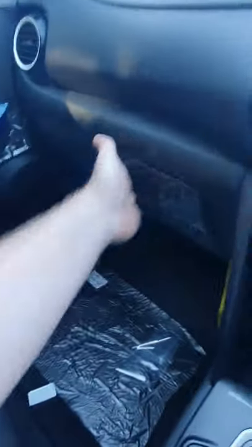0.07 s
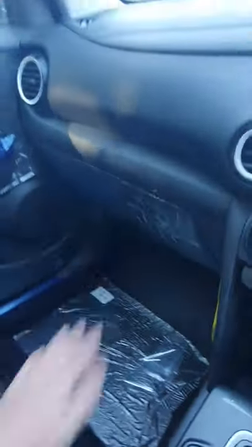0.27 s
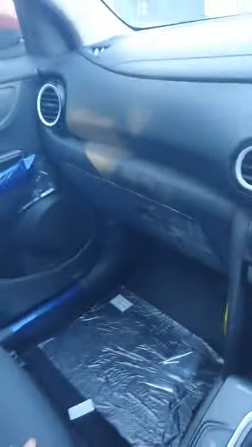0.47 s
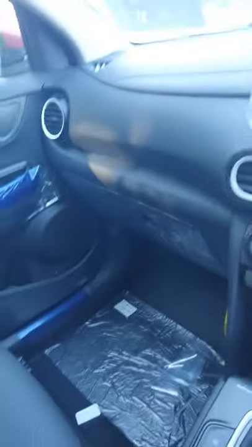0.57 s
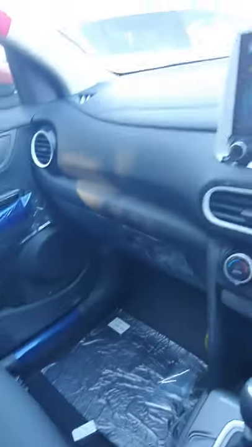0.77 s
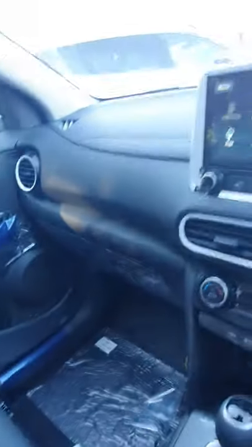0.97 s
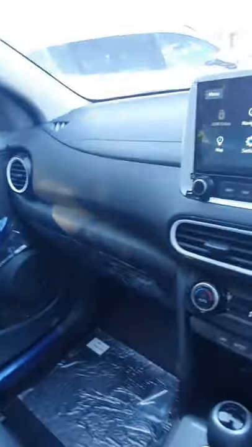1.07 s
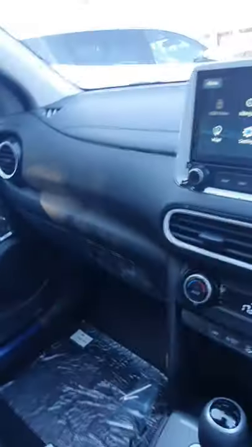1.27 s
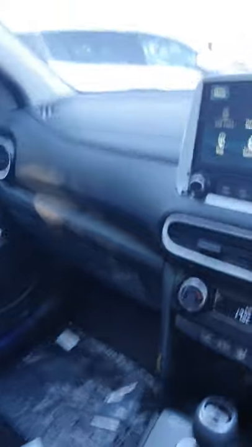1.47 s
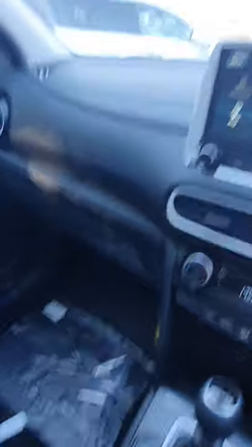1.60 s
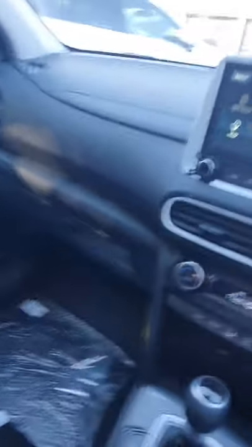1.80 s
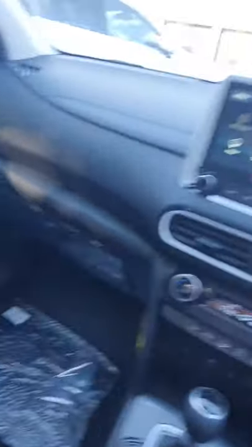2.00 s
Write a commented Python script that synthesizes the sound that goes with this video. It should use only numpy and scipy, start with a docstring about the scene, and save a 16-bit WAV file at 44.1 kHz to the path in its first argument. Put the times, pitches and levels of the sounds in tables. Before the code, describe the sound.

Inside a parked car, close to a hand-held phone microphone, a plastic glove box lid shuts with a dull thud and short rattle; patchy cloth rustle and low knocks follow, then a loud handling click and near quiet.

```python
"""In a parked car, over low cabin rumble and faint hiss, a glove box lid thumps shut: struck modes and noise.
Loose parts rattle and the dashboard shudders: band noise and low decaying sines.
A sleeve then rubs along the seat, patchy shaped noise, while soft bumps reach the hand-held phone.
Late on, fingers shift on its case: clicks of band noise and ringing, a short hissing slide, a hollow tap."""
import sys
import numpy as np
from scipy import signal
from scipy.fft import rfft, irfft
from scipy.io import wavfile
from scipy.ndimage import uniform_filter1d

SR = 44100
rng = np.random.default_rng(int(sys.argv[2]) if len(sys.argv) > 2 else 0)


def boost_factor(decibels):
    """Convert a level in decibels to a linear amplitude factor."""
    exponent = np.asarray(decibels, float) / 20
    return 10 ** exponent


def dump(signal):
    """Clip the signal to [-1, 1] and save it as 16-bit WAV at the path in sys.argv[1]."""
    limited = np.clip(np.atleast_2d(signal).T, -1, 1)
    pcm = np.round(limited * 32767).astype(np.int16)
    wavfile.write(sys.argv[1], SR, pcm)


N = 90140

# cabin rumble spectrum, relative: (frequency [Hz], density [dB per Hz])
CABIN_SPECTRUM = [(15, -19), (25, -3), (130, -1.5), (165, -20), (270, -8.5), (350, -19), (460, -18),
                  (1000, -38)]
# microphone hiss spectrum, relative: (frequency [Hz], density [dB per Hz])
HISS_SPECTRUM = [(410, -1), (1440, -10.5), (5800, -22.5), (13000, -12), (15700, -32), (16100, -59)]
# sleeve rubbing, rms of each range: (time [s], treble level [dB], mid level [dB])
RUB_LEVELS = [(0.351, -59.5, -96), (.365, -49, -55), (.4, -50.5, -56.5), (0.428, -56, -60),
              (.46, -45, -57.5), (.52, -46.5, -56.5), (.65, -51, -57.5), (.76, -58, -57), (.78, -50, -66),
              (.805, -58.5, -58.5), (.85, -50.5, -59), (.92, -51, -54), (.96, -58.5, -58),
              (1.08, -51.5, -54), (1.25, -56.5, -54), (1.33, -61, -59), (1.375, -66, -67.5),
              (1.44, -65, -63), (1.503, -50.5, -56.5), (1.575, -75.5, -75), (1.7, -69.5, -67),
              (2.04, -62, -61.5)]
# treble range of the rub, relative: (frequency [Hz], density [dB per Hz])
RUB_TREBLE_SPECTRUM = [(1760, -13), (3000, -1), (4630, 2), (12000, 2.5), (15700, 4.5), (16100, -45)]
# mid range of the rub, relative: (frequency [Hz], density [dB per Hz])
RUB_MID_SPECTRUM = [(150, -21), (260, 0), (460, 6.5), (730, -3), (1720, 3), (2530, 1.5), (4420, -5),
                    (6500, -31)]
# finger clicks on the case: (time [s], level [dB], ring [Hz], snap spread [ratio round the ring])
CLICKS = [(1.4385, -29, 7000, 2.6), (1.502, -36, 12500, 14), (1.504, -28, 5500, 8),
          (1.5147, -40, 2600, 2.5), (1.519, -34, 2000, 4), (1.5228, -21.5, 3600, 6),
          (1.525, -22.5, 1850, 5), (1.5266, -12, 13500, 8), (1.6585, -48, 2100, 1.7),
          (1.6819, -39, 2300, 2.6), (1.7035, -51, 11500, 2)]
# fingertip slide on the case: (time [s], length [s], level [dB])
SLIDES = [(1.531, .014, -39)]
# modes of a tapped hollow plastic part: (frequency [Hz], relative level [dB], t60 [s])
TAP_MODES = [(1290, 0, .075), (1500, -3, .03), (1850, -6, .03), (2600, -10, .03), (3200, -10, .025)]
# clatter of loose parts as the lid settles: (time [s], length [s], level [dB], centre [Hz])
RATTLES = [(0.036, 0.019, -54, 1800), (0.0635, 0.026, -52, 1700), (0.073, 0.022, -58, 4700),
           (.104, .022, -64, 4400)]
# soft bumps and shudders: (time [s], level [dB], frequency [Hz], t60 [s])
BUMPS = [(.032, -20, 46.5, 0.12), (0.055, -22, 39.8, 0.13), (0.075, -24.5, 98, 0.057),
         (0.098, -28.5, 36, 0.6), (.148, -35, 35.6, 0.15), (0.207, -37, 44.2, 0.36),
         (0.286, -40.5, 45, 0.31), (0.357, -25, 112, 0.023), (.374, -28.5, 90.5, 0.13),
         (0.3957, -20.5, 102, 0.078), (0.405, -21.5, 99, 0.03), (0.423, -21, 60, 0.18),
         (0.451, -21.5, 106.5, 0.12), (.508, -38, 97.5, 0.19), (.543, -38, 60, 0.21),
         (0.623, -37.5, 48.4, 0.11), (0.621, -40.5, 235, 0.056), (.795, -39, 234, 0.066),
         (0.912, -33.5, 103, 0.11), (1.332, -43.5, 46, 0.16), (1.5264, -15.5, 144, 0.015),
         (1.533, -31, 61.7, 0.054), (1.884, -40, 88.5, 0.11), (1.989, -49, 452, 0.062)]
# overtones of a bump: (frequency [Hz], relative level [dB], t60 [s])
BUMP_MODES = [(217, -10.5, 0.02), (403, -17.5, 0.017), (579, -36, 0.034)]
# lid blow and rebound: (time [s], level [dB], contact of four time constants [ms])
LID_BLOWS = [(-0.003, -16.5, 0.43), (0.002, -17.5, 0.95)]
# modes of lid and dashboard: (frequency [Hz], relative level [dB], t60 [s])
LID_MODES = [(103.4, 3, 0.047), (198, -11, 0.036), (433, -2.5, 0.017), (1190, -14, 0.0056),
             (1860, -12, 0.019), (3260, -23, 0.0073)]

CABIN_DB, HISS_DB = -55, -69
RUB_PATCH_DB, RUB_PATCHES_PER_S = 2.5, 14
SCRAPE_HZ, SCRAPE_DB, SCRAPE_FLICKER_DB = 1850, -13, 4  # SCRAPE_DB is relative to the mid range
CLICK_SNAP_DB, CLICK_RING_DB = 4, -4  # relative to the click
CLICK_SNAP_T60_S, CLICK_RING_T60_S = 0.003, 0.0045
TAP_S, TAP_DB, TAP_RISE_T60_S = 1.6196, -42, 0.001
BUMP_RISE_CYCLES, BUMP_SCUFF_T60_S = 0.14, 0.059
LID_CHATTER_DB, LID_RATTLE_DB = -6, -15.5  # relative to the blow
LID_RATTLE_T60_S, LID_RATTLE_TOP_HZ = 0.077, 3030
MIC_DIP_HZ, MIC_DIP_WIDTH_HZ, MIC_DIP_SHARE = 9100, 3050, 0.44


def unit(x):
    """Scale to rms 1."""
    return x / np.sqrt(np.mean(x ** 2))


def colour(x, points):
    """Shape by (Hz, dB) points, then scale to rms 1."""
    hz, db = np.array(points, float).T
    bin_hz = np.maximum(np.arange(len(x) // 2 + 1) * SR / len(x), 1)
    gain_db = np.interp(np.log(bin_hz), np.log(hz), db)
    return unit(irfft(rfft(x) * boost_factor(gain_db), len(x)))


def walk(rate_hz):
    """Random levels drawn rate_hz times a second and joined by ramps; rms near 1."""
    hold = int(SR / rate_hz)
    steps = np.repeat(rng.standard_normal(N // hold + 1), hold)
    return unit(uniform_filter1d(steps, hold)[:N])


def fade(t, t60_s):
    """Decay by 60 dB in t60_s."""
    return np.exp(-np.log(1000) * t / t60_s)


def ring(t, modes):
    """Sum of decaying sines."""
    return sum(boost_factor(db) * np.sin(2 * np.pi * hz * t) * fade(t, t60_s) for hz, db, t60_s in modes)


def burst(t, t60_s):
    """Decaying white noise."""
    return rng.standard_normal(len(t)) * fade(t, t60_s)


def stir(t, modes, noise):
    """Drive modes with noise scaled to unit energy."""
    return signal.fftconvolve(ring(t, modes), noise)[:len(t)] / np.sqrt(np.sum(noise ** 2))


def band(x, hz, spread):
    """Band-pass from hz / spread to hz * spread, 17 kHz at most."""
    edges_hz = [hz / spread, min(hz * spread, 17000)]
    return signal.sosfilt(signal.butter(2, edges_hz, "band", fs=SR, output="sos"), x)


def add(out, s, x):
    """Mix x in from time s; what lies outside the scene is lost."""
    i = int(s * SR)
    x = x[max(-i, 0):N - i]
    out[max(i, 0):max(i, 0) + len(x)] += x


def cabin():
    """Outside rumble booming in the cabin, and the microphone's hiss: steady shaped noise."""
    boom = colour(rng.standard_normal(N), CABIN_SPECTRUM)
    hiss = colour(rng.standard_normal(N), HISS_SPECTRUM)
    return boost_factor(CABIN_DB) * boom + boost_factor(HISS_DB) * hiss


def sleeve():
    """Cloth dragging: hiss in two ranges, patchy band by band, and a thin scrape that comes and goes."""
    s, treble_db, mid_db = np.array(RUB_LEVELS).T
    t, out = np.arange(N) / SR, np.zeros(N)
    octave = np.log2(np.maximum(np.arange(N // 2 + 1) * SR / N, 1))  # above 1 Hz
    for db, points in ((treble_db, RUB_TREBLE_SPECTRUM), (mid_db, RUB_MID_SPECTRUM)):
        spectrum = rfft(colour(rng.standard_normal(N), points))
        patches = np.zeros(N)
        for centre in np.arange(14, 29) / 2:  # overlapping bands, half an octave apart
            weight = np.maximum(1 - 2 * abs(octave - centre), 0)
            patches += irfft(spectrum * weight, N) * boost_factor(RUB_PATCH_DB * walk(RUB_PATCHES_PER_S))
        out += unit(patches) * boost_factor(np.interp(t, s, db, left=-120))
    scrape = band(rng.standard_normal(N), SCRAPE_HZ, 1.07)
    scrape = scrape * boost_factor(SCRAPE_FLICKER_DB * walk(RUB_PATCHES_PER_S))
    return out + unit(scrape) * boost_factor(np.interp(t, s, mid_db, left=-120) + SCRAPE_DB)


def tap():
    """One short push into a hollow part; neighbouring modes start in opposite directions."""
    out, t = np.zeros(N), np.arange(SR // 10) / SR
    body = ring(t, TAP_MODES[::2]) - ring(t, TAP_MODES[1::2])
    add(out, TAP_S, boost_factor(TAP_DB) * body * (1 - fade(t, TAP_RISE_T60_S)))
    return out


def fingers():
    """Each click is a noise snap round the ring pitch and a short ring; a slide hisses after the loudest."""
    out, t = np.zeros(N), np.arange(SR // 10) / SR
    for s, db, hz, spread in CLICKS:
        crack = burst(t, CLICK_SNAP_T60_S)
        crack[:4] -= 1  # the contact itself: a short push
        snap = band(crack, hz, spread)
        snap = boost_factor(CLICK_SNAP_DB) * snap / np.abs(snap).max()
        add(out, s, boost_factor(db) * (snap + ring(t, [(hz, CLICK_RING_DB, CLICK_RING_T60_S)])))
    grain = rng.standard_normal(N) * boost_factor(2 * walk(700))
    hiss = colour(grain, [(300, -20), (1500, 1)] + RUB_TREBLE_SPECTRUM[2:])
    for s, length_s, db in SLIDES:
        shape = np.sin(np.pi * np.clip(t / length_s, 0, 1))
        start = int(s * SR)
        add(out, s, boost_factor(db) * shape * hiss[start:start + len(t)])
    return out


def bumps():
    """Padded knocks: a low swing rises within a cycle; scuff noise stirs overtones, more in quicker knocks."""
    out, t = np.zeros(N), np.arange(SR // 2) / SR
    for s, db, hz, t60_s in BUMPS:
        rise = 1 - np.exp(-t * hz / BUMP_RISE_CYCLES)
        swing = rise * ring(t, [(hz, 0, t60_s)])
        overtones = stir(t, BUMP_MODES, burst(t, BUMP_SCUFF_T60_S))
        add(out, s, boost_factor(db) * (swing + 2 * np.sqrt(hz / BUMP_MODES[0][0]) * overtones))
    return out


def rattles():
    """Dense grainy clatter of loose parts, quick to start and slower to die."""
    out, t = np.zeros(N), np.arange(SR // 10) / SR
    grain = unit(rng.standard_normal(N) * boost_factor(1.4 * walk(800)))
    for s, length_s, db, hz in RATTLES:
        noise = grain[int(s * SR):][:len(t)]
        shape = np.sin(np.pi * np.clip(t / length_s, 0, 1) ** 0.5)
        clatter = 0.78 * unit(band(noise, hz, 1.12)) + unit(band(noise, hz, 4.7))
        add(out, s, boost_factor(db) * shape * clatter)
    return out


def lid():
    """Blow and opposite rebound, duller for softer contact, drive the lid's modes; chatter and rattle follow."""
    out, t = np.zeros(N), np.arange(SR // 2) / SR
    for direction, (s, db, contact_ms) in zip((-1, 1), LID_BLOWS):
        push = np.exp(-t[:400] / (contact_ms / 4000))
        body = np.convolve(ring(t, LID_MODES), push / push.sum())[:len(t)]
        noise = burst(t, LID_RATTLE_T60_S)
        chatter = stir(t, LID_MODES[1:], noise)
        rattle = signal.lfilter(*signal.butter(2, LID_RATTLE_TOP_HZ, fs=SR), noise)
        blow = body + boost_factor(LID_CHATTER_DB) * chatter + boost_factor(LID_RATTLE_DB) * rattle
        add(out, s, direction * boost_factor(db) * blow)
    return out


def scene():
    """All sources at the phone, one channel."""
    return (cabin() + sleeve() + tap() + fingers() + bumps() + rattles() + lid())[None]


def low_pass(x):
    """Removes everything above the highest recorded frequency."""
    return signal.sosfilt(signal.butter(12, 16680, fs=SR, output="sos"), x)


def record(dry):
    """The microphone port dips in the treble; the phone cuts the top."""
    peak = signal.iirpeak(MIC_DIP_HZ, MIC_DIP_HZ / MIC_DIP_WIDTH_HZ, fs=SR)
    dipped = dry - MIC_DIP_SHARE * signal.lfilter(*peak, dry)
    top_cut = signal.ellip(8, 0.2, 70, 16500, fs=SR, output="sos")
    mix = signal.sosfilt(top_cut, dipped)
    return low_pass(mix)


dry = scene()
out = record(dry)
dump(out)
```